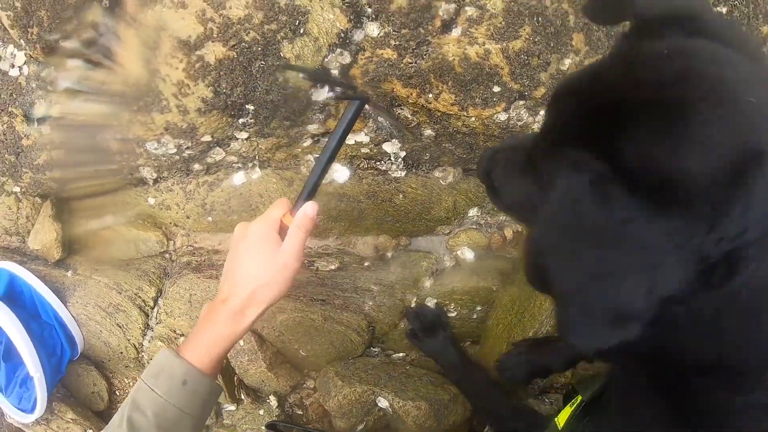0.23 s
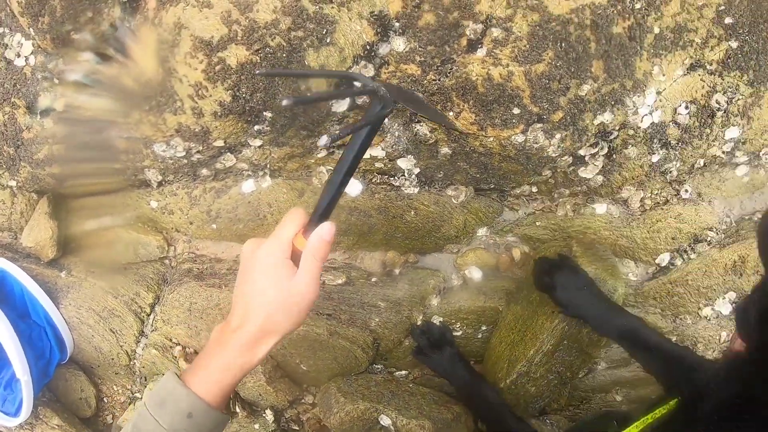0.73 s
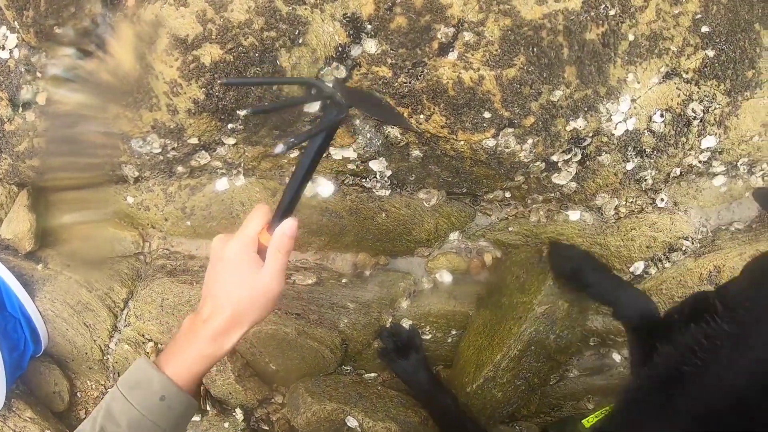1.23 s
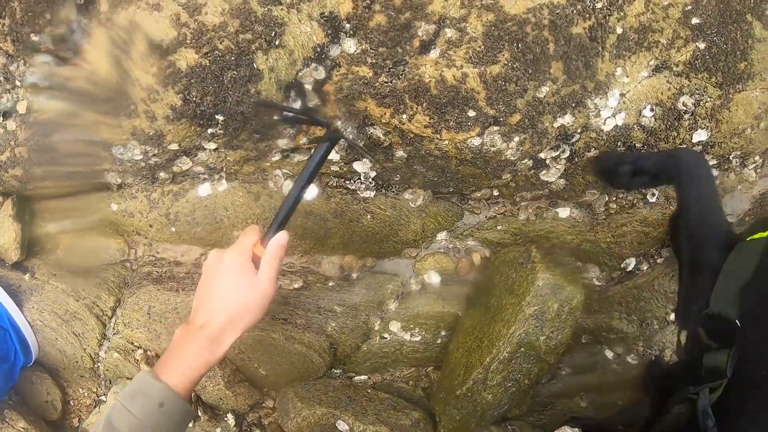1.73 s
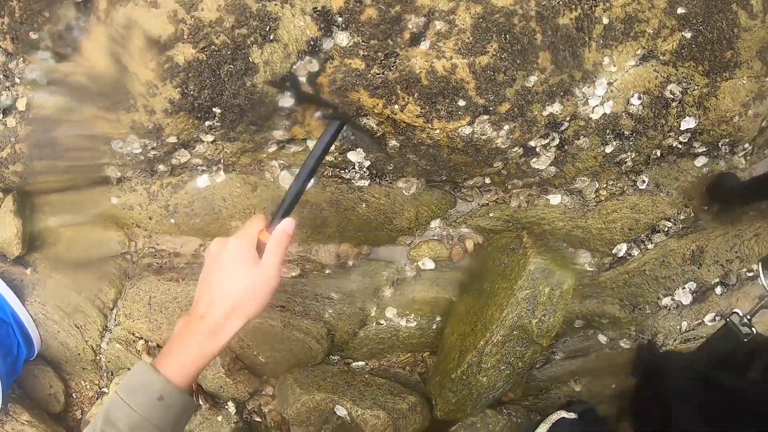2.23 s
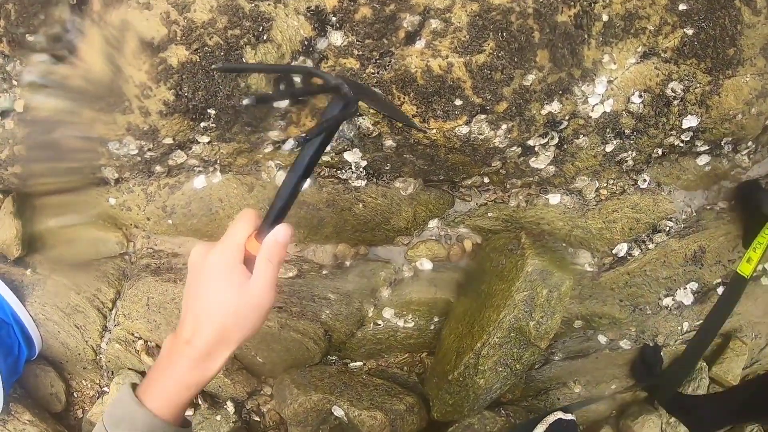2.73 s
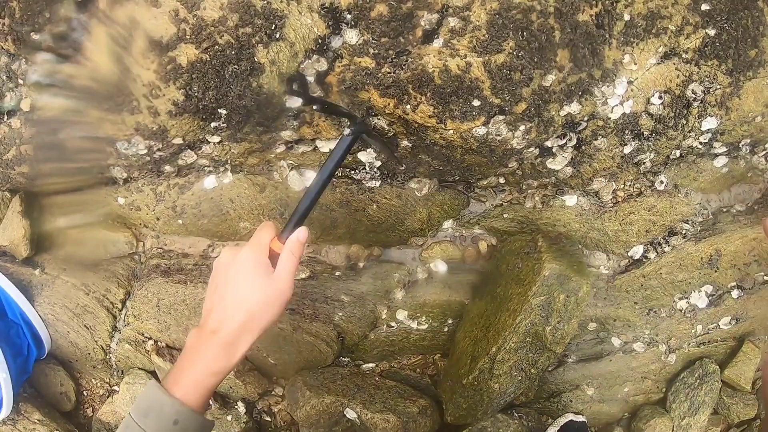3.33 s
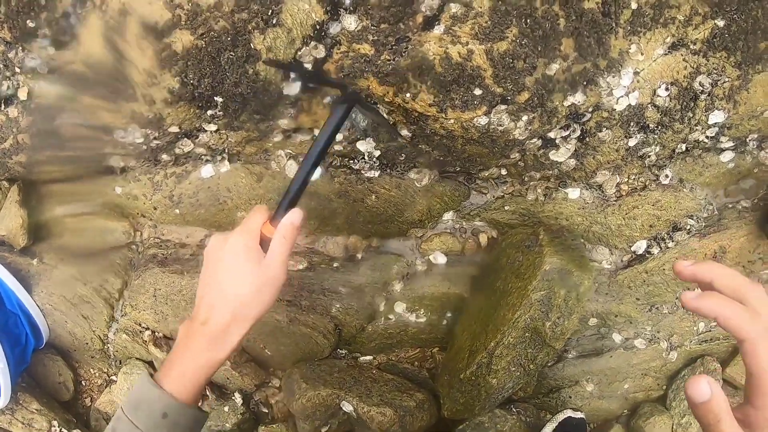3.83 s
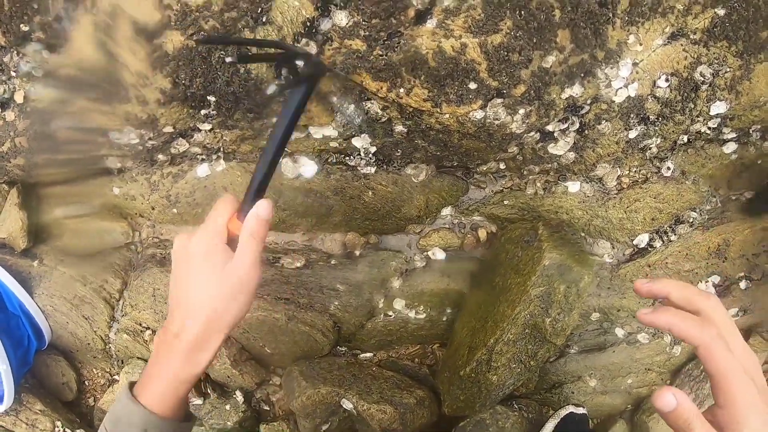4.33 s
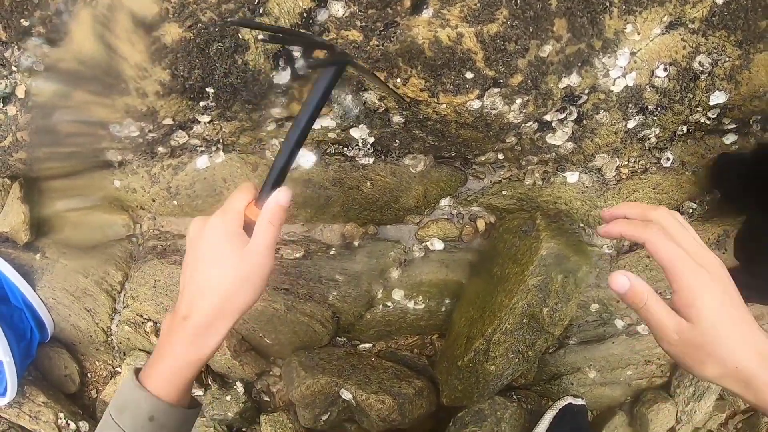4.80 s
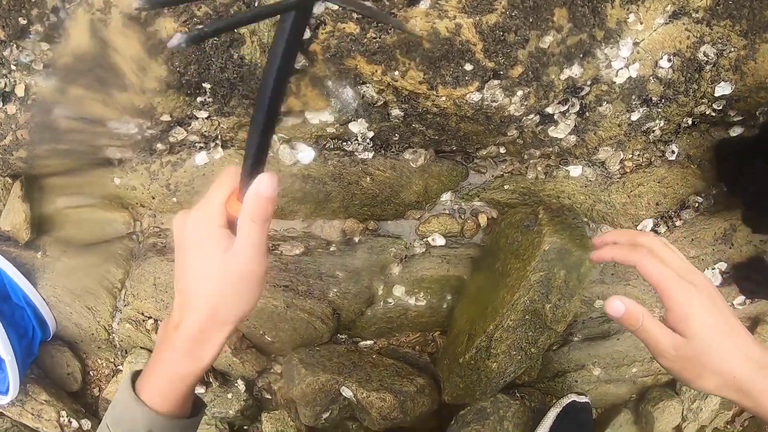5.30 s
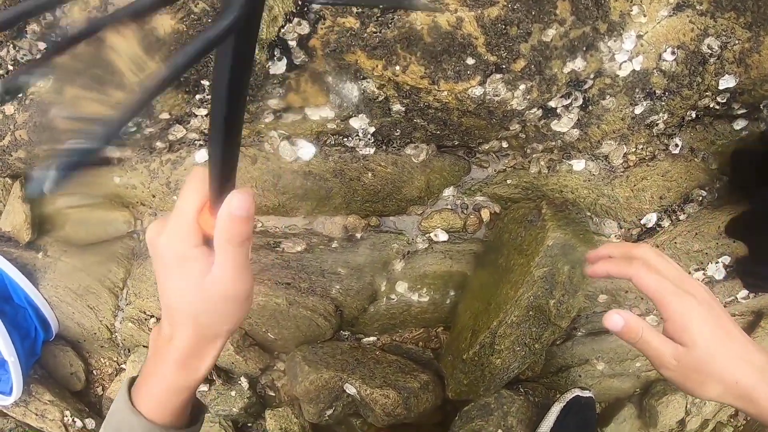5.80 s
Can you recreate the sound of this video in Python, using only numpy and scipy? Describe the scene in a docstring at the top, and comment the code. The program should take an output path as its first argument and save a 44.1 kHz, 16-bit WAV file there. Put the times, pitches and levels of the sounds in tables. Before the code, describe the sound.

Sharp metallic cracks on stone repeat about every 0.4 seconds over low wind buffeting, faint surf and light rustling, with one brief dropout.

```python
"""Six seconds on a windy shore, a small steel hand pick worked close to a two-port microphone. From the start
wind buffets the ports (noise and pressure pulses), with faint surf and a dog's paws behind (patchy noise).
A soft first blow lands at half a second, then harder ones about every 0.4 s: each cracks on rock or shell, rings the
head while it rests on the stone (decaying modes), then scrapes, bounces and sings as it lifts (longer modes).
Past halfway gusts crowd in; near 3.7 s the sound drops out for a moment, and the tapping goes on to the end."""
import sys
import numpy as np
from scipy import signal
from scipy.fft import rfft, irfft, next_fast_len
from scipy.io import wavfile
from scipy.ndimage import uniform_filter1d, minimum_filter1d, map_coordinates

SR = 44100
rng = np.random.default_rng(int(sys.argv[2]) if len(sys.argv) > 2 else 0)


def bounce(signal):
    """Save signal as a 16-bit WAV file at the path given by the first command-line argument."""
    frames = np.transpose(np.atleast_2d(signal))
    limited = np.clip(frames, -1, 1)
    pcm = np.round(limited * 32767).astype(np.int16)
    wavfile.write(sys.argv[1], SR, pcm)


N = 267069  # samples

# Levels are relative: each source adds its own offsets and fluctuation.
# Far surf and nearer rustle: (time [s], surf level [dB], rustle level [dB])
SHORE_LEVELS = [(0, -55, -64.5), (.94, -54, -73.5), (1.06, -57, -76.5), (1.25, -54, -68), (2.2, -53.5, -65),
                (2.53, -56, -70.5), (3.05, -56, -63.5), (3.3, -55.5, -66.5), (3.47, -64.5, -77.5),
                (3.8, -55.5, -71), (4.66, -55.5, -69.5), (4.9, -62, -81), (5.11, -53, -65),
                (5.24, -56, -75), (5.8, -58, -70.5), (6.06, -53.5, -64)]
# Spectra: (frequency [Hz], density [dB per Hz])
SURF_SPECTRUM = [(260, -28), (450, -3), (664, -8), (725, -7.5), (863, -12), (1100, -10.5), (3000, -24.5),
                 (3900, -52), (6600, -120)]
RUSTLE_SPECTRUM = [(1470, -45.5), (2500, -10.5), (2770, -14.5), (3770, -3.5), (4290, -9), (7590, -9),
                   (8270, -16), (14000, -30.5)]
RUMBLE_SPECTRUM = [(4.7, -44), (8.0, -9.5), (32, -1), (49, 0.5), (108, -6.5), (200, -25), (260, -38),
                   (440, -120)]
EDDY_SPECTRUM = [(60, -35), (110, -1.5), (160, -2), (250, -5), (400, -12), (600, -23.5), (1000, -33),
                 (2000, -71.5)]

# Wind at the ports: (time [s], rumble level [dB], level of eddies between gusts [dB])
WIND_LEVELS = [(0, -13, -33.5), (.45, -9.5, -29), (.7, -12.5, -32), (1.15, -9.5, -33), (1.4, -14.5, -37.5),
               (2.0, -12, -29.5), (2.3, -10.5, -37.5), (2.6, -12, -33.5), (3.0, -9.5, -33.5),
               (3.3, -11, -31), (3.9, -9, -33.5), (4.2, -11, -35), (4.45, -6.5, -31), (4.7, -7.5, -41.5),
               (5.05, -10.5, -36), (5.3, -8, -33.5), (5.6, -10, -30.5), (5.95, -4, -23.5),
               (6.06, -9.5, -43.5)]
# Moments when the rumble briefly sinks: (time [s], length [s], depth [dB])
RUMBLE_DIPS = [(.35, 0.0052, 15), (.69, 0.0082, 6.5), (.81, 0.017, 3), (.99, 0.024, 7.5),
               (2.38, 0.0053, 11.5), (3.0, 0.0085, 13.5), (3.49, 0.0063, 12), (3.735, .03, 15),
               (4.74, 0.012, 16), (4.825, 0.035, 19), (5.24, 0.021, 10)]
# Gusts that slap the ports and stir up eddies: (time [s], slap peak [dB], eddy level [dB])
WIND_GUSTS = [(0.081, -21.5, -25), (0.181, -25, -28.5), (0.269, -16, -33), (.451, -27, -14.5),
              (.477, -13.5, -23), (.88, -7, -21.5), (1.013, -12, -27.5), (2.061, -45, -23),
              (2.34, -21, -23.5), (2.816, -8, -23), (2.874, -8.5, -10.5), (2.953, -13.5, -19.5),
              (3.066, -14.5, -20.5), (3.205, -15.5, -22), (3.228, -12, -17), (3.319, -8, -17.5),
              (3.34, -11, -21), (3.367, -6.5, -18), (3.395, -20, -23), (3.422, -10.5, -22.5),
              (3.453, -13, -24.5), (3.535, -15.5, -21), (3.581, -13, -24), (3.823, -17.5, -28.5),
              (3.908, -12.5, -17.5), (4.091, -32.5, -21), (4.41, -17, -26.5), (4.642, -9, -30),
              (4.67, -5.5, -9), (4.71, -4.5, -19), (4.757, -8, -21.5), (4.785, -4.5, -18.5),
              (4.9, -12, -15), (4.969, -13, -16), (5.192, -22, -12), (5.324, -17.5, -24),
              (5.46, -28, -19.5), (5.668, -17.5, -33.5), (5.799, -14, -14.5), (5.937, -14.5, -25)]
# Sharp puffs, opposite at the two ports: (time [s], peak level [dB], cycle [Hz])
PORT_PUFFS = [(.2672, -12, 590), (2.7363, -8.5, 572), (2.82, -2, 794), (3.3162, -0.5, 800),
              (5.6675, -9, 524)]
# Low thumps as the sound drops out and comes back: (time [s], peak level [dB], cycle [Hz])
DROPOUT_THUMPS = [(3.716, -12, 53.8), (3.7588, -4.5, 107.8)]
# How alike the ports hear the eddies: (frequency [Hz], correlation, limited to -1..1)
EDDY_CORRELATION = [(100, 1), (200, 0.6), (350, -0.063), (600, -1.1)]
SLAP_HZ, SLAP_SPREAD = 265.7, 0.13  # middle cycle [Hz] and its log spread
STIR_S, STIR_DB_PER_S, SETTLE_DB_PER_S = 0.006, 358, 448.5  # a gust's hold, rise and fall
DIP_DB_PER_S = 597  # slope into and out of a dip
GUST_LIFTS_RUMBLE = 0.17  # rumble dB gained per dB that a gust stirs the eddies

# Share of a level or phase difference that goes to the left and to the right port
SIDES = np.array([[.5], [-.5]])
# The pick at the two ports: (frequency [Hz], left minus right level [dB], lead of left [rad])
PORT_DIFFERENCES = [(800, -8, .55), (1400, -4, .5), (1770, -7, .2), (2540, -8, .1), (3240, -6, -.35),
                    (3420, -3, -.45), (3750, -2, -.9), (4420, 1, -1.8), (5300, -3, -4.4), (6300, -1, -4.7),
                    (7320, -1, -6.1), (8100, 1, -7.5), (11000, -1, -7), (12500, -5, -7)]

# Modes of the free tines: (frequency [Hz], time to fall 60 dB [s], level of a slower second swing [dB])
TINE_MODES = [(2121, .35, -10), (3418, .4, -20), (3714, .3, -26), (4420, .28, -20), (5443, .2, -30),
              (6200, .1, -30), (7310, .13, -30)]
# Part that owns each mode: (index of first, second or third tine, or of the blade)
PART_OF_MODE = [0, 1, 3, 2, 3, 1, 2]
# Each mode against its part: (level [dB])
MODE_LEVELS = [-1.5, -3, -1, 1.5, -14, -15, -7]
# The tines sing: (time [s], time until stone or hand stops them [s],
# level of first, second and third tine [dB], level of blade [dB])
TINE_LIFTS = [(.125, .1, -65, -63.5, -68.5, -54.5), (.93, 0.15, -74, -50.5, -64.5, -63),
              (1.31, 0.062, -69, -60, -46, -61), (1.435, 0.19, -54.5, -64, -60, -54),
              (1.74, 0.036, -60.5, -41, -54, -53), (2.131, .045, -65.5, -45, -39, -54),
              (2.24, .037, -66, -56, -56, -54), (2.53, 0.044, -71, -71, -54.5, -66.5),
              (2.608, .15, -57, -74, -64.5, -57.5), (2.92, .07, -67, -72, -65, -63),
              (3.01, .2, -57.5, -59, -54.5, -62), (3.35, .3, -63.5, -78.5, -65, -65),
              (3.68, 0.064, -63, -38, -40.5, -49), (3.772, .11, -56.5, -64, -61.5, -49),
              (4.14, 0.23, -63.5, -44, -46.5, -53.5), (4.624, 0.049, -76.5, -56, -57, -61),
              (4.722, .15, -43.5, -63, -67.5, -36.5), (4.91, .13, -58, -79, -81, -75),
              (5.07, 0.067, -66, -61.5, -46.5, -55.5), (5.172, 0.51, -41, -66.5, -54, -45),
              (5.515, .2, -67, -54, -45.5, -60.5), (5.564, .3, -55.5, -50.5, -56.5, -65),
              (5.964, .15, -69, -56, -43, -45), (6.003, .15, -48, -42, -57, -37)]

# The head drags over grit: (time [s], length [s], level [dB])
SCRAPES = [(.518, .004, -35), (.53, .045, -50.5), (.893, .036, -33), (1.315, .01, -30.5),
           (1.375, .025, -44.5), (1.43, .025, -60.5), (1.62, .095, -52), (2.135, .006, -31.5),
           (2.15, .1, -49), (2.525, .012, -44.5), (2.59, .03, -55.5), (2.915, .016, -32.5),
           (3.3, 0.0027, -34), (4.137, .012, -23.5), (4.16, .065, -45), (4.6, .01, -25), (4.66, .03, -55),
           (4.695, .03, -42), (5.06, .012, -31), (5.145, 0.034, -38.5), (5.508, .004, -25.5),
           (5.52, .012, -28.5), (5.96, .012, -28.5), (5.99, .05, -57)]
BITE_DB_PER_S, LEAVE_DB_PER_S = 1798.5, 903  # how fast a scrape rises and falls

# Modes of the head pressed on stone: (frequency [Hz], level [dB], time to fall 60 dB [s] before the ring share)
HELD_MODES = [(805.4, 2, 0.062), (1099, -17.5, 0.09), (1794, 3, 0.058), (2164, 3, 0.014),
              (2495, 0.5, 0.064), (3190, -1, 0.052), (3416, -3, .07), (3666, 0.5, 0.029),
              (3852, 1.5, 0.016), (4640, -1, 0.045), (5220, -0.5, 0.014), (5810, -4.5, 0.055),
              (6210, 3, 0.017), (6730, -2.5, 0.05), (7340, -3, 0.1), (7710, 2, 0.041), (8200, 0, 0.027),
              (9600, 0, .035), (10270, -3, 0.053), (10890, -6.5, 0.034), (12740, -12.5, 0.023)]
# Colour zones of a contact: (frequency [Hz], level [dB])
KNOCK_ZONE = [(800, -8)]
BODY_ZONE = [(1800, -10.5), (2500, -11.5)]
MAIN_ZONE = [(3250, 0), (3440, -1)]
UPPER_ZONE = [(3670, -2.5), (3900, -2)]
TREBLE_ZONE = [(5200, -7.5), (7300, -10), (11000, -25)]
# Blows, coloured by where the point lands: (time [s], level [dB], change of knock [dB], body [dB],
# upper ring [dB] and treble [dB])
PICK_BLOWS = [(.5106, -25.5, 5, -6, 0, -1.5), (.8799, -11.5, 4, 1.5, -3.5, -1),
              (1.3007, -10, -1, 4.5, 5, 1), (1.7235, -9, 5, 2, 1, 1), (2.1206, -9.5, 1.5, -2, 0, 1),
              (2.5108, -10, 3.5, 4.5, -4, -1.5), (2.9028, -8.5, -6, -1, -10, -2.5),
              (3.282, -9, -5.5, -0.5, -16, -5), (3.6689, -12, 3.5, -0.5, 2, 3),
              (4.1245, -4, -11, -5.5, -14.5, -3.5), (4.588, -9, -3.5, -2, 10, -4),
              (5.0467, -12.5, -1, 1, 8, 5), (5.4959, -11.5, -8, 0, 7.5, -2),
              (5.9464, -10.5, 2.5, 7, 8.5, 1)]
# Bounces and chips of shell: the same columns
PICK_TICKS = [(.0687, -53.5, 11, 2, 9, 12), (.1252, -42, 0.5, -7, 5.5, -14), (.4774, -59.5, 25, 20, 16, 13),
              (.5422, -51, 10, -5, -1, 8), (1.0164, -51, 13, 15, -4, -6), (1.0296, -49.5, 10, 4, -10, -8),
              (1.3748, -55, 8, 0, -7, -2), (1.4326, -54, -3, -3, -4, 17.5), (1.4444, -63, 12, 8, 11, 23),
              (1.5094, -56, 26, 15, -4, -5), (1.818, -57, 6, 8, 2, 16.5), (1.8004, -49, 3, 8, 2, 4.5),
              (1.9929, -49.5, 11, 2, 5, 20), (2.2428, -53.5, 5, 2, -6, 19),
              (2.3161, -38, -9, 4.5, 0.5, 5.5), (2.3704, -61.5, 14, 13, 24, 34.5),
              (2.6823, -48.5, -1, -7, 9.5, 9.5), (2.7601, -56.5, 6, 9, 12, 21),
              (2.8184, -60.5, 33, 20.5, 17.5, 21.5), (2.831, -63, 10, 10, 18, 29),
              (3.0455, -56, 7, 8, 10, 21.5), (3.0924, -55, 15, 11.5, -1, 18),
              (3.2256, -55, 13, 12, 8.5, 14), (3.3099, -22.5, -1, 2.5, -1, -13.5),
              (3.468, -67, 10, 7, 0, 22), (4.035, -62.5, 12, 18, 5, 11.5),
              (4.0594, -68.5, 14.5, 12, -1, 27), (4.1709, -43, -7.5, -18.5, -3, -2),
              (5.0674, -23.5, 1, 6, 1, -4), (5.1188, -51, 7, 8, 0, 8), (5.1517, -34, -20, 3, -14, 6),
              (5.5253, -21, 7.5, -6.5, 6.5, -11.5), (5.4144, -62.5, 15, 6, 5, 12.5),
              (5.6154, -56.5, 5, 9, 0, 10.5), (5.8067, -53.5, 9, 7, -1, -2.5),
              (6.0062, -42.5, -6, -7, 1.5, 3)]
BLOW_RING, TICK_RING = 0.89, .57  # ring length as a share of the held decay times

# The sound drops out in steps: (time from which it holds [s], gain [dB])
DROPOUT_STEPS = [(0, 0), (3.7187, -45), (3.7487, -14), (3.7587, 0), (3.7687, -2)]
# Dry clicks, where the wave jumps and relaxes: (time [s], size [full scale])
WAVE_JOLTS = [(3.3689, -0.041), (4.7089, -0.098), (4.7887, -0.06)]
TOP_HZ = 16500  # band limit


def amp(db):
    """Gain of a level in dB."""
    return 10 ** (np.asarray(db) / 20)


def unit(x):
    """x at rms 1."""
    return x / np.sqrt(np.mean(x ** 2) + 1e-20)


def along(points, hz):
    """(Hz, value) points read on a log frequency axis."""
    f, v = np.transpose(points)
    return np.interp(np.log(hz + 1), np.log(f + 1), v)


def curves(rows):
    """One value per sample for each column after the time."""
    s, *cols = np.transpose(rows)
    return [np.interp(np.arange(N) / SR, s, c, left=-120, right=c[-1]) for c in cols]


def wobble(rate):
    """A smooth random curve, rate knots a second."""
    knots = rng.standard_normal(int(N * rate / SR) + 4)
    return map_coordinates(knots, [np.arange(N) * rate / SR])


def filtered(x, response):
    """x through a complex response of frequency."""
    m = next_fast_len(N + 8192)
    return irfft(rfft(x, m) * response(np.fft.rfftfreq(m, 1 / SR)), m)[..., :N]


def add(track, s, sound):
    """Mixes a sound into a track at time s."""
    part = track[..., round(s * SR):][..., :sound.shape[-1]]
    part += sound[..., :part.shape[-1]]


def rush(spectrum, alike, pan_db):
    """Stereo noise from mid and side, rms 1 before panning; alike is the left-right correlation by frequency."""
    def shape(hz):
        turn = np.arccos(np.clip(along(alike, hz), -1, 1)) / 2
        return amp(along(spectrum, hz)) * np.array([np.cos(turn), np.sin(turn)])

    mid, side = filtered(rng.standard_normal((2, N)), shape)
    return unit(np.array([mid + side, mid - side])) * amp([[pan_db / 2], [-pan_db / 2]])


def patches(rate, width_hz):
    """Random dB field over frequency and time, rms 1, for a short-time spectrum of 512 samples."""
    field = rng.standard_normal((257, N // 256 + 2))
    field = uniform_filter1d(field, int(width_hz / 86) + 1, 0)  # 86 Hz a bin
    return unit(uniform_filter1d(field, int(172 / rate) + 1, 1))  # 172 frames a second


def patchy(x, depth_db):
    """x with patches of random gain, at rms 1."""
    z = signal.stft(x, nperseg=512)[2]
    gain = amp(depth_db * patches(30, 500))[:, :z.shape[-1]]
    return unit(signal.istft(z * gain, nperseg=512)[1][:, :N])


def swells(rows, rise_db_per_s, fall_db_per_s, floor_db):
    """Level in dB of the strongest (start s, length s, dB) event: it rises, holds and falls at fixed slopes."""
    t = np.arange(0, N, 32) / SR
    s, length, db = np.transpose(rows)[:, :, None]
    before, after = np.maximum(s - t, 0), np.maximum(t - s - length, 0)
    shape = db - rise_db_per_s * before - fall_db_per_s * after
    return np.interp(np.arange(N) / SR, t, np.maximum(shape.max(axis=0), floor_db))


def pulses(rows, tightness):
    """Short pressure pulses of about one cycle, pushing or pulling by chance."""
    track, t = np.zeros(N), np.arange(-2000, 2000) / SR
    for (s, db, hz), sign in zip(rows, rng.choice([-1, 1], len(rows))):
        pulse = np.cos(2 * np.pi * hz * t) * np.exp(-(tightness * hz * t) ** 2)
        add(track, s + t[0], sign * amp(db) * pulse)
    return track


def ports(hz):
    """Level and phase of the pick at each microphone port."""
    f, pan_db, lead = np.transpose(PORT_DIFFERENCES)
    return amp(SIDES * np.interp(hz, f, pan_db)) * np.exp(1j * SIDES * np.interp(hz, f, lead))


def head(f, width, contrast):
    """The held head as broad resonances of alternating sign, width a share of each pitch."""
    total = 0
    for k, (c, db, _) in enumerate(HELD_MODES):
        loss = 1j * f * width * c
        total = total + (-1) ** k * amp(contrast * db) * loss / (c * c - f * f + loss)
    return total


def shore():
    """Surf far off and a crackly rustle of paws, harness and sleeve, both noise of patchy gain."""
    surf_db, rustle_db = curves(SHORE_LEVELS)
    surf = patchy(rush(SURF_SPECTRUM, [(500, 0.048), (2500, 0.067)], pan_db=-3.5), depth_db=1.84)
    crackle = amp(2.6 * wobble(30) + 0.67 * wobble(720))
    grainy = crackle * rush(RUSTLE_SPECTRUM, [(3000, 0.38), (7000, 0.12)], pan_db=-2.5)
    rustle = patchy(grainy, depth_db=3)
    return amp(surf_db + 5.0 + 1.9 * wobble(30)) * surf + amp(rustle_db + 9) * rustle


def wind():
    """Turbulence at the ports: near-mono rumble, lumpy eddies less alike between ports, and slaps of pressure."""
    rumble_db, calm_db = curves(WIND_LEVELS)
    dip_db = swells(RUMBLE_DIPS, DIP_DB_PER_S, DIP_DB_PER_S, floor_db=0)
    stirs = [(s, STIR_S, db) for s, _, db in WIND_GUSTS]
    stirred_db = swells(stirs, STIR_DB_PER_S, SETTLE_DB_PER_S, floor_db=-120)

    lift_db = GUST_LIFTS_RUMBLE * np.maximum(stirred_db - calm_db, 0)
    rumble_db = rumble_db - dip_db + lift_db - 1 + 1.2 * wobble(12)
    rumble = amp(rumble_db) * rush(RUMBLE_SPECTRUM, [(30, 1.0), (120, 0.78)], pan_db=-2.5)

    # between gusts the eddies sink a little with the rumble
    eddy_db = np.maximum(calm_db - 0.37 * dip_db + 3.1 * wobble(14), stirred_db)
    lumps = unit(amp(4.25 * wobble(45)) * rush(EDDY_SPECTRUM, EDDY_CORRELATION, pan_db=-3.5))
    eddies = amp(eddy_db) * lumps

    spread = np.exp(SLAP_SPREAD * rng.standard_normal(len(WIND_GUSTS)))
    gust_slaps = [(s, db, SLAP_HZ * k) for (s, db, _), k in zip(WIND_GUSTS, spread)]
    slaps = pulses(gust_slaps + DROPOUT_THUMPS, tightness=1.31)

    push = rumble + eddies + slaps * amp([[-1.8], [1.8]])
    # large swings of the wind are softly saturated
    push = push / (1 + np.abs(push / amp([[-3.5], [-1.5]])) ** 3) ** (1 / 3)
    return push + pulses(PORT_PUFFS, tightness=1.7) * [[-.75], [1]]


def tines():
    """Once free of the stone the tines ring long and clean, wavering as the head turns."""
    track, t = np.zeros(N), np.arange(SR // 2) / SR
    hz, t60, slow_db = np.transpose(TINE_MODES)[:, :, None]
    fade = amp(-60 * t / t60) + amp(slow_db - 60 * t / (4 * t60))
    for s, length, *part_db in TINE_LIFTS:
        strength = amp(np.take(part_db, PART_OF_MODE) + MODE_LEVELS)[:, None]
        ring = strength * fade * np.sin(2 * np.pi * (hz * t + rng.random(hz.shape)))
        stopped = amp(-60 * np.maximum(t - length, 0) / .04)
        add(track, s, (1 - np.exp(-t / 0.005)) * stopped * ring.sum(axis=0))
    return track * amp(2.5 * wobble(18))


def scrape():
    """Uneven grit excites the resonances of the head, most of all the low knock and those near the main ring."""
    level_db = swells(SCRAPES, BITE_DB_PER_S, LEAVE_DB_PER_S, floor_db=-120)
    grit = rng.standard_normal(N) * amp(4.5 * wobble(120) + 3.5 * wobble(600))
    tone = [(800, 1.5), (2000, -16), (3500, -1.5), (5200, -13.5), (7400, -11.5), (11000, -28)]
    drag = filtered(grit, lambda f: head(f, width=.03, contrast=.9) * amp(along(tone, f)))
    return amp(level_db) * unit(drag)


def contact_colour(knock_db, body_db, upper_db, treble_db):
    """Spectrum of one contact: each zone shifted by where the point lands, each point scattered a little."""
    zones = [KNOCK_ZONE, BODY_ZONE, MAIN_ZONE, UPPER_ZONE, TREBLE_ZONE]
    colour = [(300, -49.5)]
    for zone, change in zip(zones, [knock_db, body_db, 0, upper_db, treble_db]):
        colour += [(hz, db + change + 1.5 * rng.standard_normal()) for hz, db in zone]
    return colour


def held_ring(t, colour, share, scatter_db):
    """The head pressed on stone rings in short modes, of new strength, pitch and phase at each contact."""
    hz, level, t60 = np.transpose(HELD_MODES)[:, :, None]
    sides, heard = SIDES[:, :, None], ports(hz[:, 0])[:, :, None]
    # high modes beam narrowly, so the angle of the head changes what each port gets
    turn = (hz / 6500) ** 2
    draw = rng.standard_normal((5, *hz.shape))
    strength = level + along(colour, hz) + scatter_db * draw[0] + 4 * sides * turn * draw[4]
    pitch = hz * (1 + (.006 + 16 / hz) * draw[1])  # the grip on the stone shifts each mode a little
    phase = 2 * np.pi * pitch * t + 9 * draw[2] + 0.77 * sides * turn * draw[3]
    ring = amp(strength - 60 * t / (share * t60)) * np.imag(heard * np.exp(1j * phase))
    # the stone takes most energy while the point still bites
    return (ring * (1 + 0.84 * np.exp(-t / 0.005))).sum(axis=1)


def grit_crack(t, colour, share):
    """Breaking grit: a noise burst and a longer, stepped crumble, shaped by the head."""
    f = np.fft.rfftfreq(len(t), 1 / SR)
    noise = rng.standard_normal((3, len(t)))
    burst = amp(-60 * t / (share * .02))
    steps = np.repeat(noise[1, :len(t) // 120 + 1], 120)[:len(t)]  # a new level every 120 samples
    crumble = amp(-4 - 60 * t / (share * .07) + 4.5 * steps)
    grit = rfft((noise[0] + 0.39 * noise[1:]) * (0.67 * burst + crumble))  # partly shared by the ports
    response = amp(along(colour, f)) * head(f, width=0.11, contrast=0.26) * ports(f)
    return irfft(grit * response, len(t)) * np.cos(np.pi / 2 * t / t[-1])


def strikes(rows, share, crack_db, scatter_db):
    """Each contact rings the held head over a short crack of breaking grit."""
    track, t = np.zeros((2, N)), np.arange(SR // 8) / SR
    for s, db, *zone_changes in rows:
        colour = contact_colour(*zone_changes)
        ring = held_ring(t, colour, share, scatter_db)
        crack = grit_crack(t, colour, share)
        onset = 1 - np.exp(-t / 0.00044)
        add(track, s, amp(db - 6.0) * onset * (ring + amp(crack_db) * crack))
    return track


def scene():
    """Shore and wind lie around the pick, which reaches the two ports at different levels and phases."""
    background = shore() + wind()
    lifted_and_dragged = filtered(tines() + scrape(), ports)
    ticks = strikes(PICK_TICKS, TICK_RING, crack_db=13.5, scatter_db=6)
    blows = strikes(PICK_BLOWS, BLOW_RING, crack_db=9.5, scatter_db=3.0)
    return background + lifted_and_dragged + ticks + blows


def record(dry):
    """Ducks the bass to make room for peaks, clips, drops out once, adds clicks and cuts all above the band limit."""
    bass = filtered(dry, lambda hz: 1 / (1 + (hz / 500) ** 6))
    rest = dry - bass
    room = np.clip((.95 - np.abs(rest)) / (np.abs(bass) + 1e-9), 0, 1).min(axis=0)
    gain = uniform_filter1d(minimum_filter1d(room, size=500), size=500)
    limited = np.clip(rest + gain * bass, -.94, .94)

    starts, db = np.transpose(DROPOUT_STEPS)
    step_gain = amp(db[np.searchsorted(starts, np.arange(N) / SR, side="right") - 1])

    clicks = np.zeros(N)
    for s, size in WAVE_JOLTS:
        add(clicks, s, size * np.exp(-np.arange(1000) / SR / 0.0018))
    return filtered(limited * step_gain + clicks, lambda hz: hz < TOP_HZ)


dry = scene()
out = record(dry)
bounce(out)
```